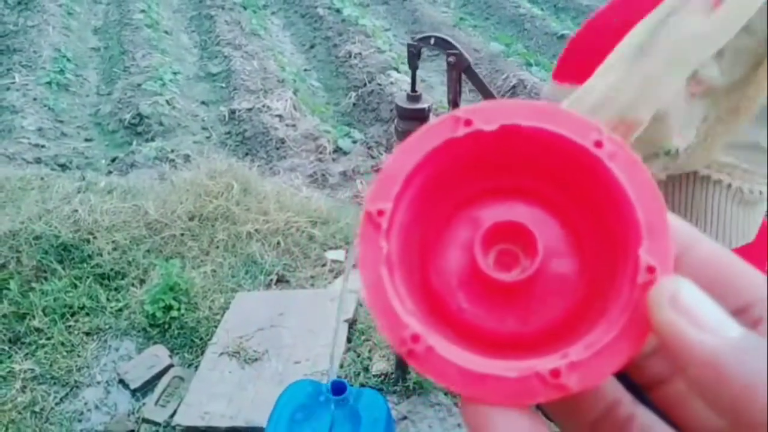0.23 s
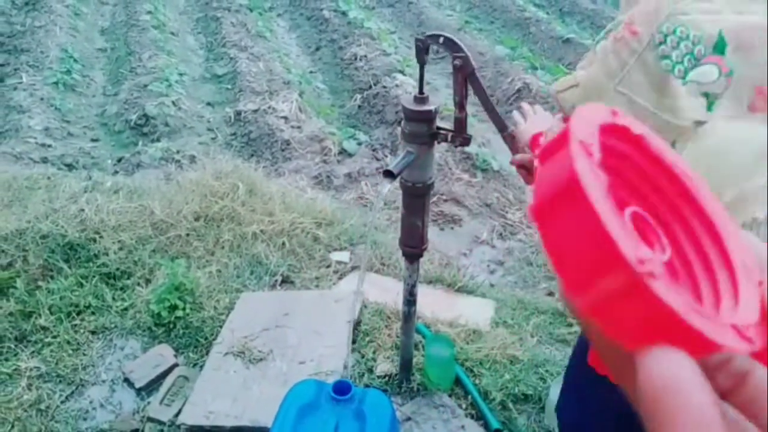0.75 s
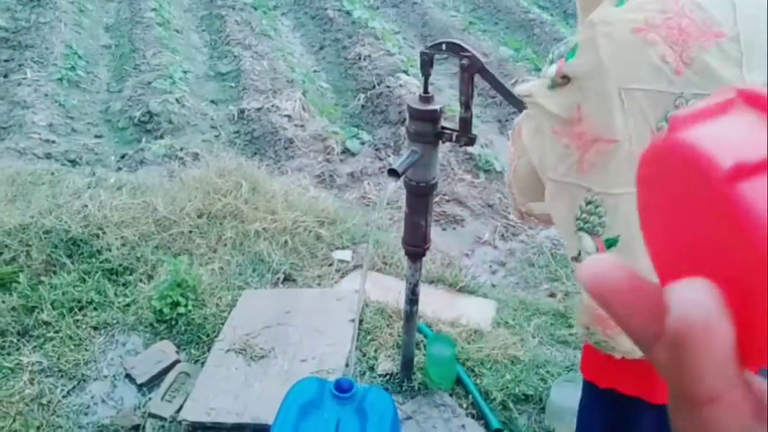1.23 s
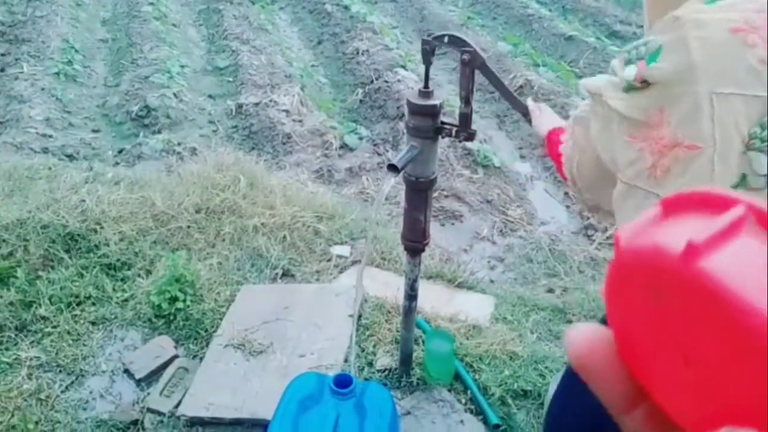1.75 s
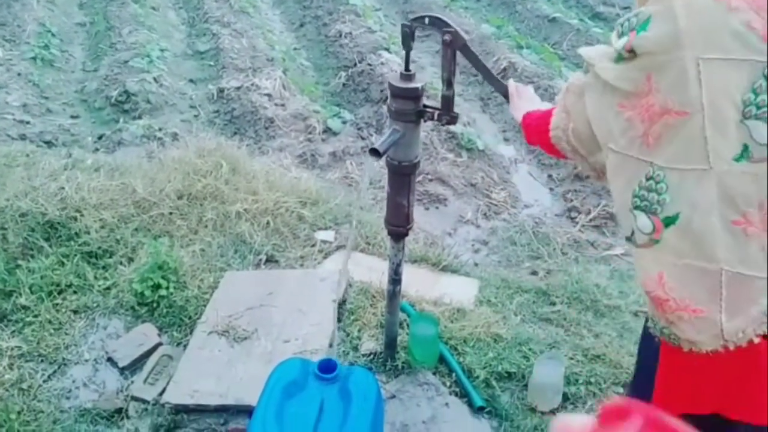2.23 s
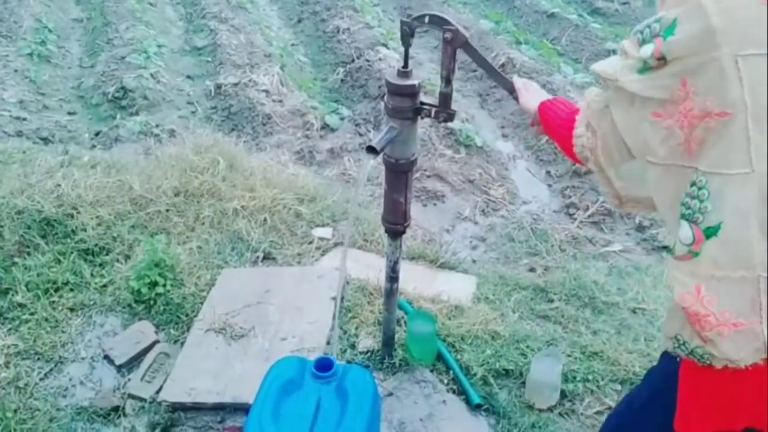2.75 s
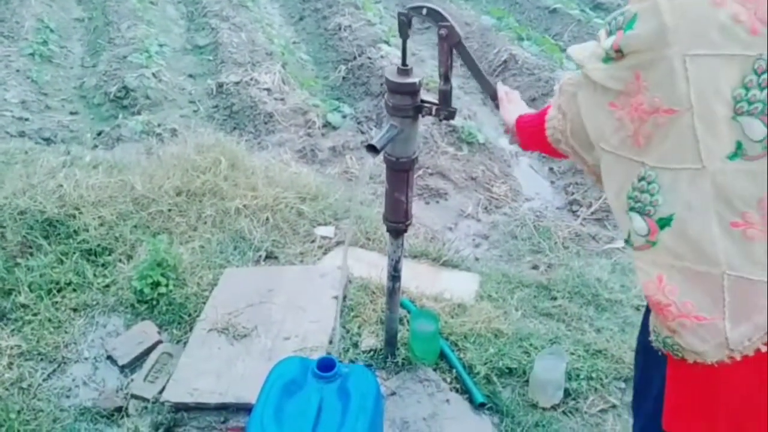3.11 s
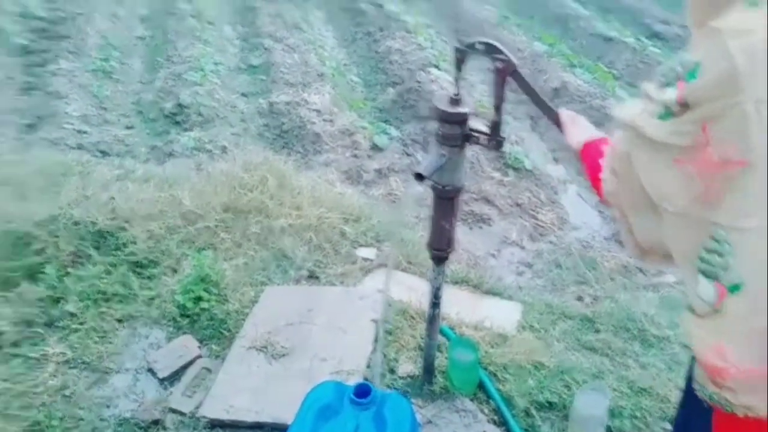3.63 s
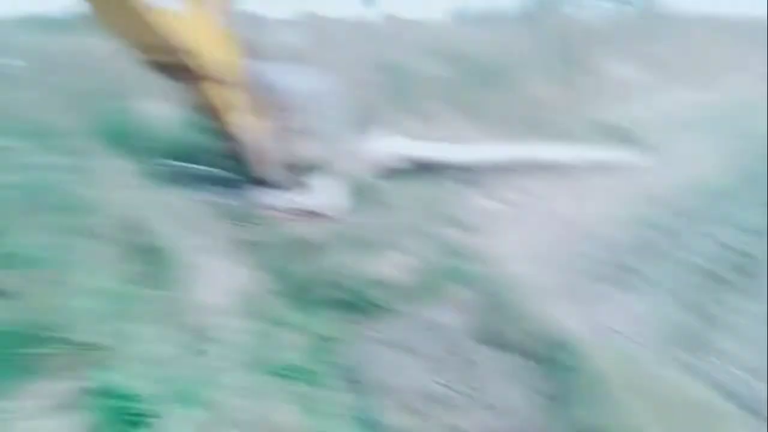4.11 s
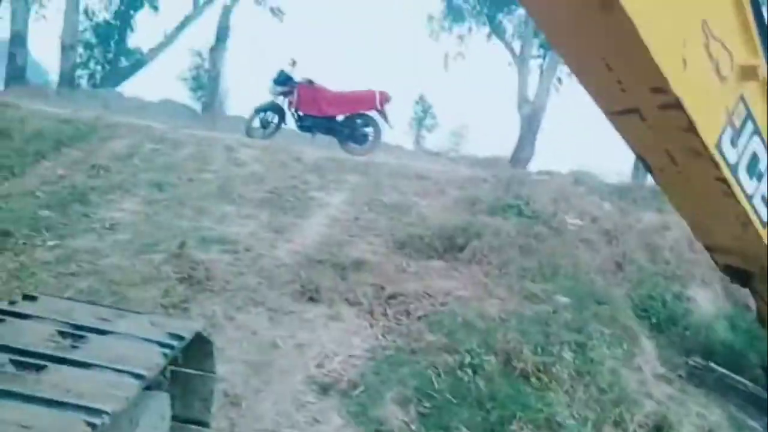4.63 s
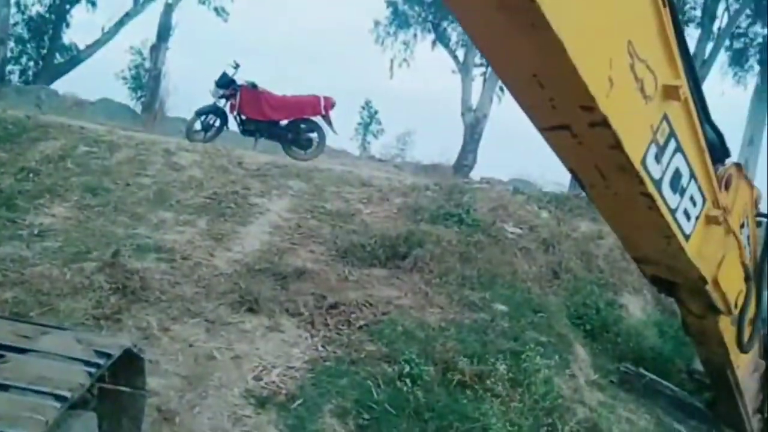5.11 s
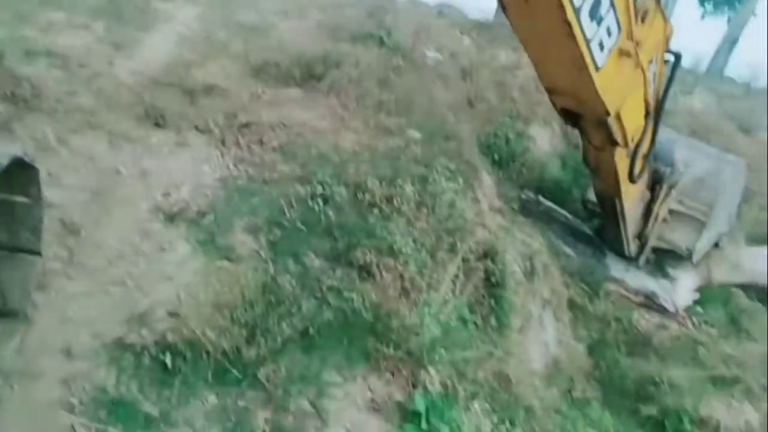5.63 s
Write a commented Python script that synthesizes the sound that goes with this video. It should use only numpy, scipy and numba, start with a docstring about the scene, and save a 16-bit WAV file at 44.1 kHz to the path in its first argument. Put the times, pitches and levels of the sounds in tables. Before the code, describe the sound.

Bright bursts of water slap and spatter on the ground beside an iron hand pump, with metallic rubbing, knocks and a few clinks outdoors.

```python
"""Water slaps and spatters on the ground in bursts, as spray noise and bubble notes over a droplet trickle.
It comes from an iron hand pump worked in an open field, heard from a couple of metres.
Noise blows and rubbing of the rod ring the modes of the iron barrel; metal clinks in decaying sines.
A far bird, a gliding sine, chirps once; a faint rumble of filtered noise lies under it all."""
import sys
import numpy as np
from scipy import signal
from scipy.fft import rfft, irfft
from scipy.io import wavfile
from scipy.ndimage import uniform_filter1d
from numba import njit

SR = 44100
rng = np.random.default_rng(int(sys.argv[2]) if len(sys.argv) > 2 else 0)


def digitize_waveform(pressure):
    """Quantize a signal to 16-bit integers and store it at the path in sys.argv[1].

    Rows of a 2-D input are taken as channels; values are limited to [-1, 1].
    """
    field = np.atleast_2d(pressure).T
    bounded = np.clip(field, -1, 1)
    quanta = np.round(bounded * 32767).astype(np.int16)
    wavfile.write(sys.argv[1], SR, quanta)


def volts_from_decibels(level):
    """Turn decibel levels (scalar or array-like) into linear amplitude factors."""
    exponent = np.asarray(level, float) / 20
    return 10 ** exponent


N = 258867  # length [samples]


def unit(x):
    """Normalisation: scales a signal to rms 1."""
    return x / np.sqrt(np.mean(x ** 2))


def colour(x, points):
    """Spectral shaping: filters by a curve of (frequency [Hz], level [dB]), linear in log frequency."""
    hz, db = np.transpose(points)
    f = np.arange(len(x) // 2 + 1) * SR / len(x) + 1
    gain = volts_from_decibels(np.interp(np.log(f), np.log(hz), db))
    return irfft(rfft(x) * gain, len(x))


def band(x, hz, width):
    """Simple resonance: a two-pole filter with its bandwidth in Hz."""
    return signal.lfilter(*signal.iirpeak(min(hz, .45 * SR), hz / width, fs=SR), x)


def steep(x, hz, width):
    """Cascaded resonance: three passes darken the skirts."""
    return band(band(band(x, hz, width), hz, width), hz, width)


def highpass(x, order, hz):
    """High-pass filtering: a maximally flat response above the corner."""
    return signal.sosfilt(signal.butter(order, hz, "high", fs=SR, output="sos"), x)


def walk(rate, size=N):
    """Random modulation: a new level every 1 / rate seconds, slewed, with spread near 1."""
    k = max(int(SR / rate), 2)
    held = np.repeat(rng.standard_normal(size // k + 1), k)
    return 1.32 * uniform_filter1d(held, k)[:size]


def ring(x, hz, t60, waver=0):
    """Modal decay: x drives one mode of drifting pitch; a unit impulse rings with peak near 1."""
    turn = np.exp(2j * np.pi * np.cumsum(hz * (1 + waver * walk(12))) / SR)
    pole = np.exp(-np.log(1000) / (t60 * SR))
    return (signal.lfilter([1], [1, -pole], x / turn) * turn).imag


def columns(table):
    """Linear interpolation: the columns of a time table at every sample."""
    s, *values = np.transpose(table)
    return [np.interp(np.arange(N) / SR, s, v) for v in values]


@njit
def drops(n, start, hz, cycles, size, glide):
    """Bubble resonance: each droplet is a sine that swells for a cycle, rises in pitch and dies."""
    out = np.zeros(n)
    for k in range(len(start)):
        period = SR / hz[k]
        phase = 0.
        for i in range(min(int(6 * cycles[k] * period), n - start[k])):
            turns = i / period
            phase += 2 * np.pi / period * (1 + glide * turns / cycles[k])
            out[start[k] + i] += size[k] * np.sin(phase) * np.exp(-turns / cycles[k]) * min(turns, 1.)
    return out


def rain(low_hz, high_hz, cycles, spread_db, count):
    """Random superposition of droplets: a few much larger (or, with negative spread, smaller) than the rest."""
    when, pitch, life, big = rng.random((count, 4)).T
    start = (when * N).astype(np.int64)
    hz = low_hz * (high_hz / low_hz) ** pitch
    size = volts_from_decibels(-spread_db * np.log(1 - big))
    return unit(drops(N, start, hz, cycles * (.5 + life), size, 0.032))


def flicker(low_hz, high_hz, depth_db, rate):
    """Independent band modulation: narrow noises, eight to the octave, each swell and sink alone."""
    centres = low_hz * 2 ** np.arange(0, np.log2(high_hz / low_hz), 1 / 8)
    return unit(sum(band(rng.standard_normal(N), hz, hz / 14) * volts_from_decibels(depth_db * walk(rate))
                    for hz in centres))


# slaps of water that stand out:
# (time [s], level [dB], bubble pitch [Hz], relative body level [dB], decay constant [s])
STRONG_SLAPS = [(.006, -30, 2000, -5, 0.0021), (.041, -36, 3460, -10, 0.0058),
                (0.09, -35, 3420, 13, 0.0057), (0.0338, -28.5, 1445, 13.5, 0.0055),
                (0.085, -27, 5560, -6, 0.0038), (0.122, -29.5, 2640, 12, 0.0043),
                (0.13, -22, 6120, -5, 0.014), (0.162, -13.5, 5670, -14, 0.0011),
                (0.185, -26, 5040, -1, 0.0029), (0.203, -28, 6500, -33, 0.01),
                (0.258, -20.5, 7000, -23, 0.0022), (0.3025, -33, 2550, 3.5, 0.0084),
                (0.3917, -10.5, 7530, -15, 0.00042), (0.366, -27.5, 6300, -26, 0.0038),
                (.383, -43, 3300, 0, 0.0012), (.404, -38.5, 2200, 2, 0.006),
                (.417, -32.5, 2160, -2, 0.0021), (0.436, -26, 7340, -15, 0.0019),
                (.447, -34, 1970, -5, 0.0033), (0.4764, -26.5, 2800, -10, 0.0022),
                (.509, -39, 2260, 6, 0.0012), (.531, -46, 4270, -12, 0.0017), (.958, -44, 2350, -12, .007),
                (0.715, -43, 6830, 0, 0.0084), (0.9768, -31, 7600, 8.5, 0.018),
                (1.068, -32, 6130, -13, 0.0045), (1.1106, -25.5, 7700, -29, 0.0047),
                (1.131, -43, 2270, 23.5, 0.0044), (1.145, -20, 4540, -9, 0.012),
                (1.222, -36, 2600, -5, 0.017), (1.2889, -57, 7900, -18, 0.0063),
                (1.3205, -34, 2280, 10, 0.0083), (1.7437, -39, 2230, 16.5, 0.0052),
                (1.958, -23.5, 7860, -2, 0.0097), (2.012, -44, 1680, 11, 0.002),
                (2.038, -31, 6160, 14.5, 0.0017), (2.0758, -13.5, 7850, -6, 0.0052),
                (2.0967, -28.5, 3580, 14.5, 0.0059), (2.12, -33, 6250, -16, 0.026),
                (2.139, -45, 893, 12, 0.011), (2.166, -40, 2270, 9, 0.012), (2.175, -47, 880, 6, 0.011),
                (2.2719, -28, 2300, 1, 0.0087), (2.553, -33, 6060, -38, 0.0027),
                (2.7892, -17.5, 7280, -26, 0.0068), (2.863, -47, 1220, 27, 0.0099),
                (2.921, -23, 7360, -26, 0.0012), (2.9574, -36.5, 3600, 15, 0.0043),
                (2.976, -17, 8470, 6, 0.0059), (3.012, -28.5, 6070, -22, 0.0058),
                (3.031, -29, 6500, 4.5, 0.015), (3.132, -26, 5880, -33, 0.0013),
                (3.151, -36, 6860, -35, 0.0032), (3.252, -33.5, 6900, -3.5, 0.0074),
                (3.5483, -40.5, 1336, 14, 0.0098), (3.5818, -18.5, 6070, -5, 0.0068),
                (3.6753, -31.5, 4170, -14, 0.0034), (3.758, -25, 8100, -15, 0.00062),
                (3.8051, -13.5, 6400, -8, 0.0081), (3.826, -29, 5120, 17, 0.0044),
                (3.853, -34, 7160, 2.5, 0.022), (3.9653, -38.5, 4340, -18, 0.0023),
                (4.424, -31, 3650, -25, 0.019), (4.499, -40, 1300, -14, 0.012),
                (4.4969, -24, 6100, -1.5, 0.0088), (4.687, -30, 7150, -1.5, 0.028),
                (4.917, -53, 1310, -0.5, 0.018), (4.941, -44, 2120, -5, 0.019),
                (4.9372, -36, 7240, 7, 0.014), (5.03, -37.5, 7360, -32, 0.008),
                (5.1454, -40, 8540, -3, 0.0077), (5.211, -50, 1410, 4, 0.0032),
                (5.348, -46.5, 1287, 3, 0.02), (5.442, -43.5, 3390, -2, 0.0083),
                (5.3005, -22, 6550, 2.5, 0.0065), (5.353, -44, 2260, 6, 0.011),
                (5.496, -39.5, 2080, 15, 0.039), (5.506, -27, 6020, -23, 0.008),
                (5.5434, -30, 6000, -1, 0.017), (5.557, -42.5, 1120, -10, 0.023),
                (5.56, -33, 2213, -13, 0.027), (5.631, -40.5, 2540, -6, 0.035),
                (5.8056, -37, 7500, -10, 0.012)]
# colour of struck water: (frequency [Hz], relative density [dB per Hz])
SPRAY_SPECTRUM = [(470, -71), (800, -0.5), (1470, -4), (1680, -58), (2110, 3.5), (3100, -1.5), (6430, 4),
                  (8370, 3), (13300, -19.5), (14000, -17.5)]
CLEAR, SMALL_CLEAR = .4, .15  # weight of the bubble note against spray; small slaps are mostly spray
LEAD_S, LEAD_DB = 0.0055, -30  # faint ragged noise leading into each slap: length [s], relative level [dB]
BODY_LAG = 2.4  # the body's decay constant is this many times the slap's


def slaps():
    """Impact and bubble resonance: ragged spray, a pitched bubble note and a weak longer spatter."""
    out, size = np.zeros(N), 6144
    t = np.arange(size) / SR
    for k, (s, db, hz, body_db, decay) in enumerate(STRONG_SLAPS + small_slaps(count=130)):
        clear = CLEAR if k < len(STRONG_SLAPS) else SMALL_CLEAR
        noise = rng.standard_normal(size)
        spray = colour(noise, SPRAY_SPECTRUM)
        spray = unit(signal.lfilter(*signal.butter(2, 2600, "high", fs=SR), spray))

        body_shape = np.minimum(t / (0.35 * decay), 1) * np.exp(-t / (BODY_LAG * decay))
        body = body_shape * volts_from_decibels(body_db) * 0.12 * unit(steep(noise, 1870, 3040))
        # main fall, longer spatter, and a brief crack 1 ms in
        fall = np.exp(-t / max(decay, .0007)) + 0.048 * np.exp(-t / 0.062)
        fall = fall + 0.063 * np.exp(-((t - .001) / 0.00025) ** 2)

        note = np.sin(2 * np.pi * hz * t * (1 + 1.02 * t))  # pitch rises slightly
        note = note * np.exp(-t / np.clip(.5 * decay, .0005, 12 / hz)) * volts_from_decibels(2.98 * walk(565, size=size))
        ragged = (spray * fall + body) * volts_from_decibels(1.77 * walk(350, size=size))
        burst = (1 - clear) * ragged + 4.76 * clear * note
        rise = np.minimum(t / (0.00051 + 0.099 * decay), 1)

        i, lead = int(s * SR), int(LEAD_S * SR)
        out[i - lead:i] += volts_from_decibels(db + LEAD_DB) * spray[-lead:] * volts_from_decibels(6.6 * walk(680, size=lead))
        out[i:i + size] += (volts_from_decibels(db) * 0.62 * burst * rise)[:N - i]
    return out


SMALL_OVER_DB, SMALL_SPREAD_DB = 11, 6  # least level over the spatter, and random extra [dB]
SMALL_HZ, SMALL_DECAY_S = (4300, 8970), (.0015, .006)  # ranges of pitch [Hz] and decay constant [s]
SMALL_BODY_DB, SMALL_BODY_DB_PER_OCT = -24, -8.5  # relative body level at 6 kHz; lower notes carry more


def small_slaps(count):
    """Random arrivals: lesser slaps at chance moments, their level following the spatter around them."""
    when, big, pitch, life = rng.random((count, 4)).T
    s = LEAD_S * 2 + when * (N / SR - LEAD_S * 3)
    spatter_db = columns(TRICKLE_LEVELS)[0][(s * SR).astype(int)]
    db = spatter_db + SMALL_OVER_DB + SMALL_SPREAD_DB * big
    hz = SMALL_HZ[1] * (SMALL_HZ[0] / SMALL_HZ[1]) ** (pitch ** 2)
    decay = SMALL_DECAY_S[0] * (SMALL_DECAY_S[1] / SMALL_DECAY_S[0]) ** life
    body_db = SMALL_BODY_DB + SMALL_BODY_DB_PER_OCT * np.log2(hz / 6000)
    return list(zip(s, db, hz, body_db, decay))


# trickle between slaps:
# (time [s], spatter level [dB], gurgle level [dB], deep gurgle level [dB])
TRICKLE_LEVELS = [(0.0, -44.5, -53.5, -55.5), (0.26, -47.5, -55, -68.5), (0.5, -49.5, -52, -67),
                  (0.72, -55, -81, -65), (1.0, -53.5, -64, -69), (1.31, -50, -54, -57),
                  (1.58, -53.5, -68.5, -72.5), (1.75, -54.5, -63, -69.5), (2.26, -50.5, -67, -67),
                  (2.52, -51.5, -76.5, -73.5), (2.76, -57, -57, -71.5), (2.94, -53, -56, -59),
                  (3.11, -54, -85, -71), (3.27, -56.5, -68, -76.5), (3.45, -55, -60.5, -69),
                  (3.73, -55, -61, -67), (4.25, -58.5, -67.5, -69), (4.56, -56.5, -61.5, -70),
                  (4.88, -59, -72, -80.5), (5.0, -61, -71.5, -78), (5.25, -59, -65, -73),
                  (5.51, -52.5, -56, -69.5), (5.62, -60, -85, -69), (5.87, -53, -58, -78)]


def trickle():
    """Superposed bubble resonances: dense droplets over hiss that flickers band by band."""
    spatter_db, gurgle_db, deep_db = columns(TRICKLE_LEVELS)
    ticks = rain(3000, 12500, cycles=0.53, spread_db=-5.5, count=3000)
    fizz = rain(3000, 12670, cycles=12, spread_db=2, count=4000)
    hiss = flicker(3200, 14000, 2.74, 16)
    spatter = unit(colour(hiss + 0.5 * ticks + .5 * fizz, SPRAY_SPECTRUM))
    spatter = spatter * volts_from_decibels(2.5 * walk(90))

    gurgle = flicker(1857, 3400, 5, 14)
    gurgle = gurgle + .8 * rain(1752, 3330, cycles=7, spread_db=1.5, count=1300)
    gurgle = unit(gurgle) * volts_from_decibels(3 * walk(50))

    deep = flicker(1186, 1450, 6, 12)
    deep = deep + .8 * rain(1200, 1400, cycles=14, spread_db=1.5, count=400)
    surge = volts_from_decibels(.8 * walk(50))  # the stream breaks into gouts
    stream = spatter * volts_from_decibels(spatter_db) + gurgle * volts_from_decibels(gurgle_db)
    return surge * stream + unit(deep) * volts_from_decibels(deep_db)


def glugs():
    """Low bubble resonance: big slow bubbles, 19 dB under the deep gurgle's level."""
    bubbles = rain(557, 1000, cycles=9.3, spread_db=2.5, count=250)
    return bubbles * volts_from_decibels(columns(TRICKLE_LEVELS)[2] - 19)


# treble of the water above 9 kHz: (time [s], gain [dB])
TREBLE_GAIN = [(0, -2), (.75, 2), (1.3, -1.5), (1.7, -6), (2.2, -1.5), (3.3, -5), (4.2, -2.5), (4.7, -3),
               (5.2, -5), (5.87, -2.5)]


def balance_treble(water):
    """Zero-phase filtering: the treble is split off by passes in both directions and its level moved."""
    top = highpass(water[::-1], 4, 9000)[::-1]
    top = highpass(top, 4, 9000)
    return water + top * (volts_from_decibels(columns(TREBLE_GAIN)[0]) - 1)


# modes of the iron barrel: (frequency [Hz], relative level [dB], t60 [s])
BARREL_MODES = [(212.5, -6, 0.17), (242, -4.5, 0.14), (268, -3.5, 0.12), (300, -8, 0.13), (336, -1, 0.049),
                (500, -17.5, 0.065), (592, -14.5, 0.052), (698, -12.5, 0.039), (830, -17.5, 0.04),
                (940, -34, 0.022), (1156, -9.5, 0.11), (1400, -20, 0.077), (1495, -1, 0.076),
                (1840, -8, 0.062), (2137, -5, 0.019), (2202, -6.5, 0.07), (2460, -8, 0.028),
                (2614, -1.5, 0.061), (2770, -0.5, 0.06), (2860, 3.5, 0.041), (3330, -3, 0.065)]
# rod knocking in the barrel, middle and upper drive relative to the knock:
# (time [s], level [dB], middle modes [dB], upper modes [dB], boom frequency [Hz])
ROD_KNOCKS = [(1.144, -42.5, 4, 11, 268), (1.171, -44, 8, -8, 267), (1.222, -46.5, -13, 3, 242),
              (1.307, -55, -10, 5, 256), (2.076, -43.5, 4.5, 9, 300), (2.269, -32.5, -2, 2, 245),
              (2.309, -52, -5, 10, 250), (2.312, -39, -26, -8, 254), (2.344, -46, 1, 8, 237),
              (2.357, -50.5, 17.5, -14, 249), (2.385, -52.5, 9, 13.5, 230), (2.42, -61.5, 0, 17, 225),
              (2.437, -62.5, -6, 20, 234), (2.788, -56.5, 9.5, 16.5, 260), (2.973, -43, 4, 10, 278),
              (3.812, -50, -4, 11.5, 254), (4.681, -59, 9, 24, 340), (5.51, -49, -8, 8, 217),
              (5.545, -46, -12, 10.5, 310), (5.563, -55.5, 1, 11, 317)]
PUSH_S = .0005  # rise of the blow that shakes the post [s]
BOOM_WIDTH_HZ = 135  # each blow favours the bending notes near its own
WAVER = .014  # share by which the mode pitches wander at random
UNEVEN_DB = 3.5  # unevenness of the drive from moment to moment; halved for the low modes


def pump():
    """Modal excitation: knocks and rubbing drive the barrel modes; harder contact reaches the upper ones."""
    soft, firm, hard, size = np.zeros(N), np.zeros(N), np.zeros(N), 8192
    t = np.arange(size) / SR
    push = t * np.exp(-t / PUSH_S) / (PUSH_S ** 2 * SR)
    for s, db, middle_db, upper_db, boom_hz in ROD_KNOCKS:
        i = int(s * SR)
        post_noise, contact_noise = rng.standard_normal((size, 2)).T
        # the post shudders on after the blow
        shudder = push + 0.022 * post_noise * np.exp(-t / 0.032) * np.minimum(t / 0.0082, 1)
        soft[i:i + size] += volts_from_decibels(db) * 1.17 * steep(shudder, boom_hz, BOOM_WIDTH_HZ)
        # the contact chatters for a few ms, with a weaker tail
        contact = np.exp(-t / 0.0019) + 0.12 * np.exp(-t / 0.026)
        chatter = contact_noise * contact * np.minimum(t / 0.0031, 1) / 8
        firm[i:i + size] += volts_from_decibels(db + middle_db) * chatter
        hard[i:i + size] += volts_from_decibels(db + upper_db) * chatter

    hum, moan, upper = strokes()
    scrape = rng.standard_normal(N) * volts_from_decibels(3 * walk(60)) / 30
    low = soft + steep(scrape * hum, 228, 120)  # rubbing hums on the lowest bending notes
    middle = steep(firm, 777, 910) + steep(scrape * moan * 3, 586, 110)
    high = hard + scrape * upper * volts_from_decibels(1.5 * walk(40)) * 2.6  # the rod catches and slips
    high = steep(high, 1880, 2270)

    out = np.zeros(N)
    for hz, db, t60 in BARREL_MODES:
        drive = low if hz < 400 else middle if hz < 950 else high
        # the rod touches the wall at changing spots, so each mode is driven unevenly
        uneven = volts_from_decibels((1 if hz > 400 else .5) * UNEVEN_DB * walk(24))
        out += volts_from_decibels(db) * ring(drive * uneven, hz, t60, WAVER)
    return highpass(out, 4, 180)


# rod rubbing in the barrel, one row per stroke, levels relative:
# (time [s], length [s], hum level [dB], moan level [dB], upper ring level [dB])
ROD_RUBS = [(0.138, 0.19, -74.5, -75, -90), (0.527, 0.13, -84, -83, -61), (0.613, 0.094, -100, -48.5, -71),
            (0.675, 0.061, -92, -88, -60.5), (0.702, 0.083, -53.5, -72, -61), (0.793, 0.1, -49, -66, -63.5),
            (0.885, 0.1, -59.5, -49, -60.5), (1.906, 0.21, -87, -82, -66), (2.547, 0.015, -96, -80, -77),
            (5.621, 0.047, -90, -55, -58), (5.701, 0.056, -72.5, -58, -61.5), (5.774, 0.025, -99, -79, -61),
            (5.826, 0.029, -96, -90, -56.5)]
RUB_ATTACK_S, RUB_RELEASE_S = 0.014, 0.0052  # linear rise and fading time constant [s]


def strokes():
    """Friction drive: rod pressure on the low, middle and upper modes rises quickly, holds and fades."""
    t, out = np.arange(N) / SR, np.zeros((3, N))
    for s, length, *db in ROD_RUBS:
        rise = np.clip((t - s) / RUB_ATTACK_S, 0, 1)
        fade = np.exp(-np.maximum(t - s - length, 0) / RUB_RELEASE_S)
        out += volts_from_decibels(np.array(db))[:, None] * rise * fade
    return out


# metallic clinks, a lower one at 1.147 s and a higher ringing one near 5.03 s:
# (time [s], frequency [Hz], level [dB], t60 [s])
CLINK_TONES = [(1.147, 2066, -38, 0.17), (5.033, 8720, -53, 0.15), (5.035, 3020, -52.5, 0.83),
               (5.037, 5650, -47, 0.058)]
CLINK_RING_S, CLINK_CUT_S = .16, .012  # time before the cut, then its fading time constant [s]


def clinks():
    """Modal decay with a cut-off: single tones ring, then are cut short after a set time."""
    out, t = np.zeros(N), np.arange(N) / SR
    for s, hz, db, t60 in CLINK_TONES:
        tap = np.zeros(N)
        tap[int(s * SR)] = volts_from_decibels(db)
        cut = np.exp(-np.maximum(t - s - CLINK_RING_S, 0) / CLINK_CUT_S)
        out += ring(tap, hz, t60) * cut
    return out


# glide of the far bird: (time [s], frequency [Hz], level [dB])
BIRD_CHIRP = [(4.535, 6100, -78), (4.548, 6100, -55), (4.578, 4950, -55), (4.592, 5500, -63),
              (4.606, 6350, -53), (4.635, 6500, -59)]


def bird():
    """Frequency modulation: one faint chirp dips and rises, husky through random pitch and level."""
    hz, db = columns(BIRD_CHIRP)
    t = np.arange(N) / SR
    husky_hz = hz * (1 + .012 * walk(400))
    tone = np.sin(2 * np.pi * np.cumsum(husky_hz) / SR)
    sounding = (t > BIRD_CHIRP[0][0]) * (t < BIRD_CHIRP[-1][0])
    return tone * volts_from_decibels(db + 4.5 * walk(300)) * sounding


# spectrum of the distant rumble: (frequency [Hz], relative density [dB per Hz])
FIELD_SPECTRUM = [(15, -55), (25, -8), (74, 8), (156, -17.5), (301, -4.5), (494, -12), (600, -12),
                  (900, -25.5), (1170, -15), (1700, -61)]
# rumble of moving air: (time [s], level [dB])
BREEZE_LEVELS = [(0.0, -64), (0.5, -75.5), (1.0, -74.5), (1.9, -81), (2.15, -67), (2.5, -82.5),
                 (4.17, -82.5), (4.28, -72.5), (5.31, -83.5), (5.87, -74.5)]


def field():
    """Shaped broadband noise: low distant rumble, and air moving over the microphone."""
    far = unit(colour(rng.standard_normal(N), FIELD_SPECTRUM)) * volts_from_decibels(-79 + 2 * walk(5.4))
    air = unit(steep(rng.standard_normal(N), 77, 129))
    return far + air * volts_from_decibels(columns(BREEZE_LEVELS)[0] + 2 * walk(34))


def scene():
    """Linear superposition: all sources at one spot; water this thin has no bass."""
    water = highpass(slaps(), 8, 880) + highpass(trickle(), 6, 1020) + glugs()
    return (balance_treble(water) + pump() + clinks() + bird() + field())[None]


GATE_OVER_DB, GATE_DEPTH_DB = -3, -15  # threshold re the quiet level found, and deepest cut [dB]


def quiet_parts_down(x):
    """Spectral subtraction: the quietest parts of each band above 1 kHz are turned down."""
    hz, _, z = signal.stft(x, SR, nperseg=1024, noverlap=768)
    power = uniform_filter1d(np.abs(z) ** 2, size=9, axis=-1)  # over time
    power = uniform_filter1d(power, size=3, axis=-2)  # over frequency
    floor = uniform_filter1d(np.percentile(power, 12, axis=-1), size=15, axis=-1)[..., None]
    gain = 1 - volts_from_decibels(2 * GATE_OVER_DB) * floor / (power + 1e-18)
    gain = np.clip(gain, volts_from_decibels(GATE_DEPTH_DB), 1)
    gain[..., hz < 1000, :] = 1  # below 1 kHz all passes untouched
    return signal.istft(z * gain, SR, nperseg=1024, noverlap=768)[1][..., :N]


def roll_off(x):
    """The treble ends steeply here."""
    return signal.sosfilt(signal.butter(12, 15110, fs=SR, output="sos"), x)


def record(dry):
    """Band limiting: the quietest parts of each band are turned down and the top above 14050 Hz is cut."""
    top_cut = signal.ellip(8, .2, 60, 14050, fs=SR, output="sos")
    mix = signal.sosfilt(top_cut, quiet_parts_down(dry))
    return roll_off(mix)


dry = scene()
out = record(dry)
digitize_waveform(out)
```